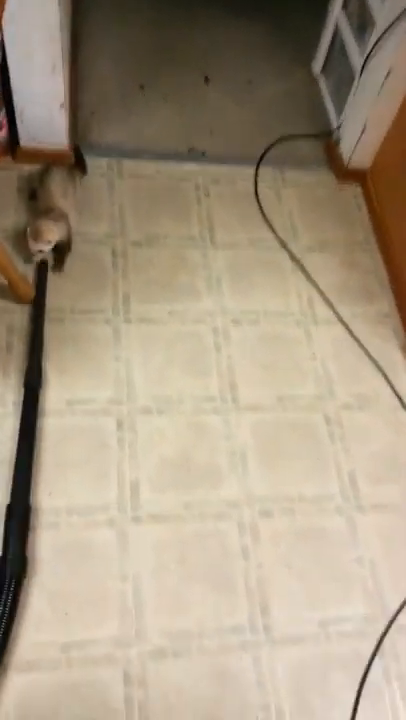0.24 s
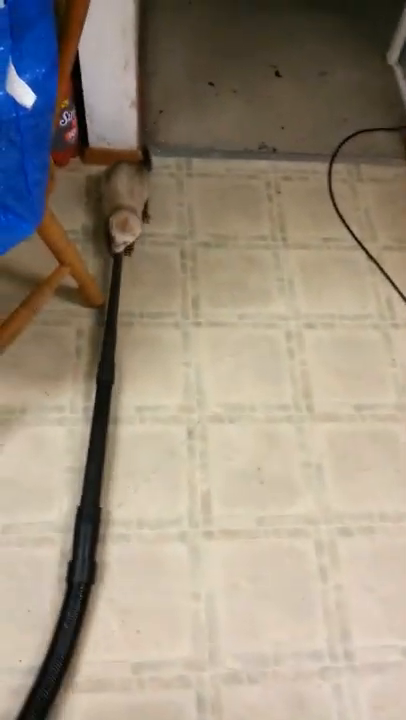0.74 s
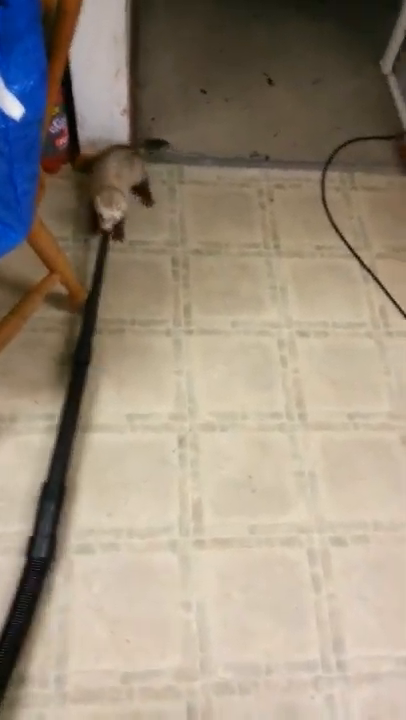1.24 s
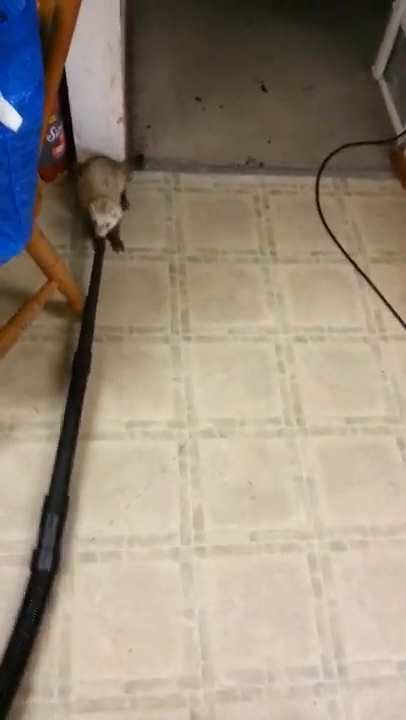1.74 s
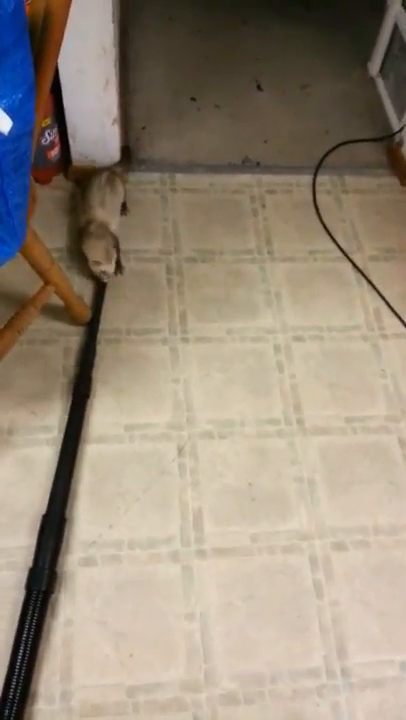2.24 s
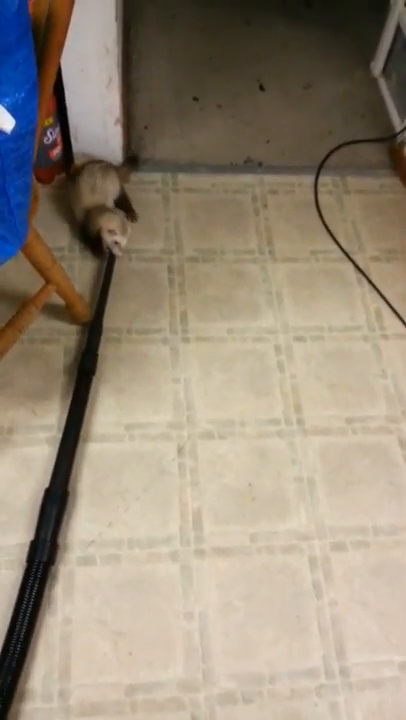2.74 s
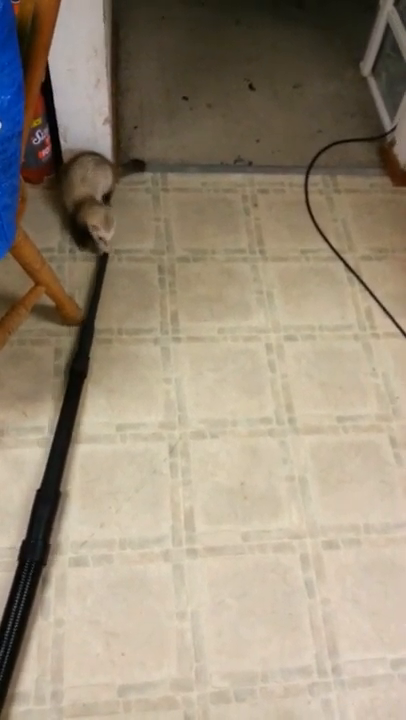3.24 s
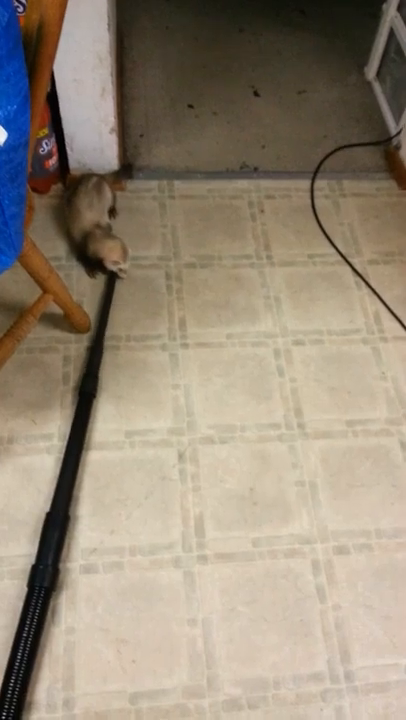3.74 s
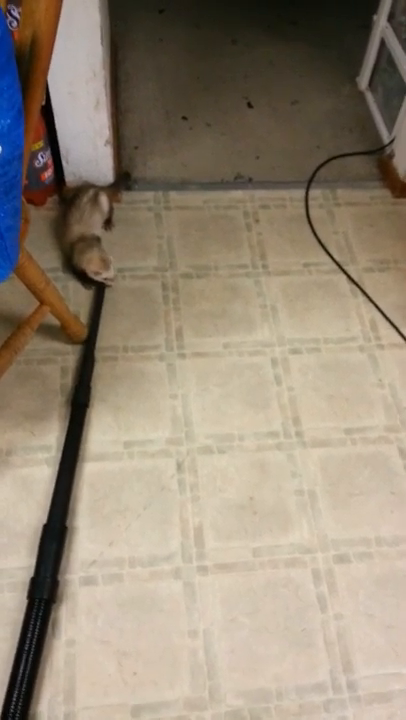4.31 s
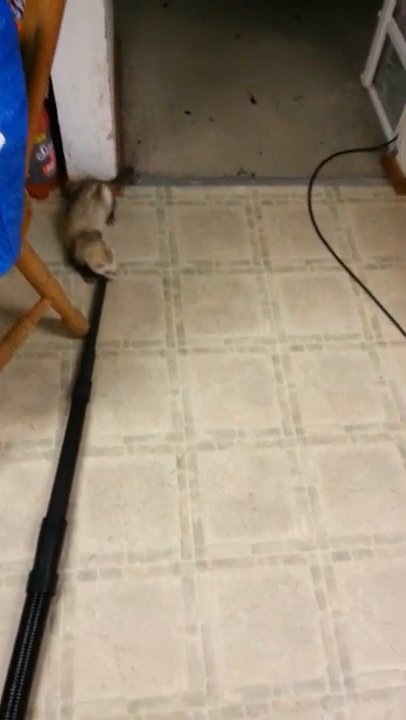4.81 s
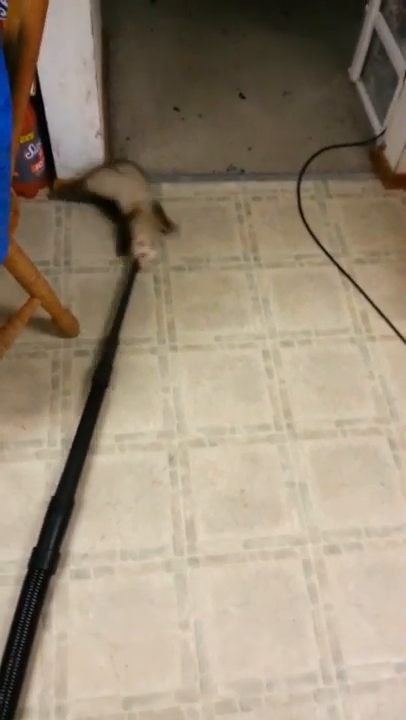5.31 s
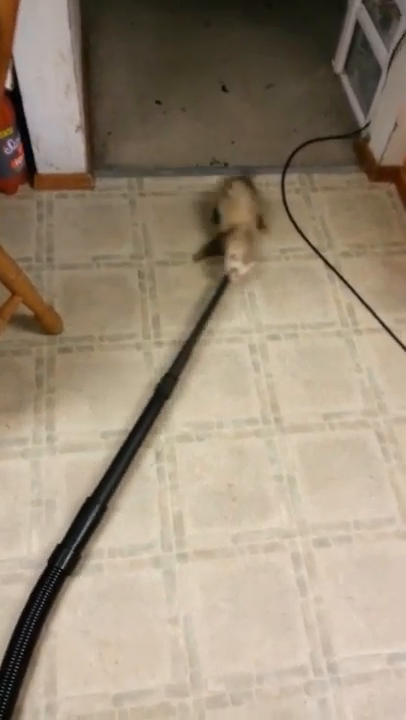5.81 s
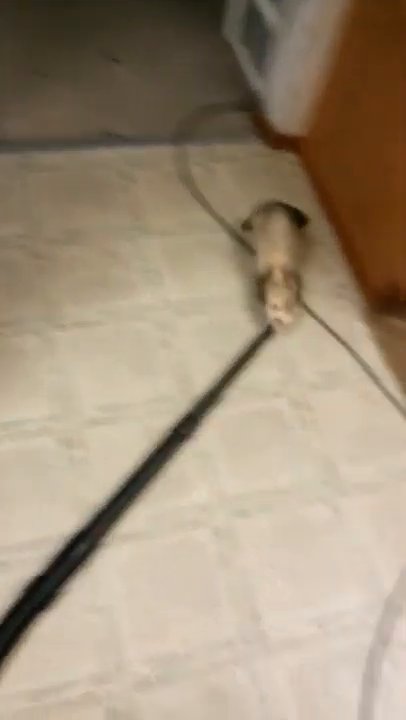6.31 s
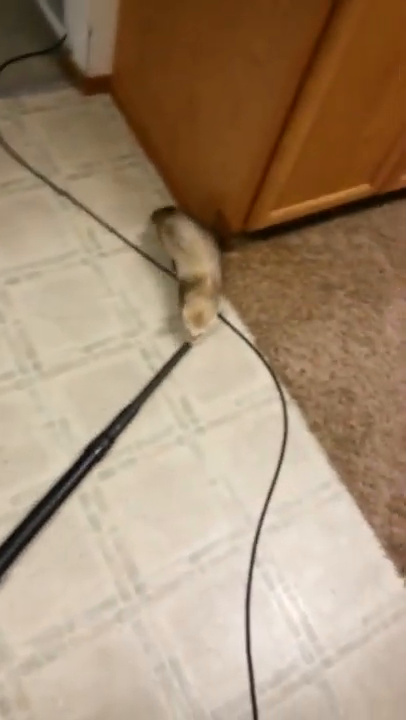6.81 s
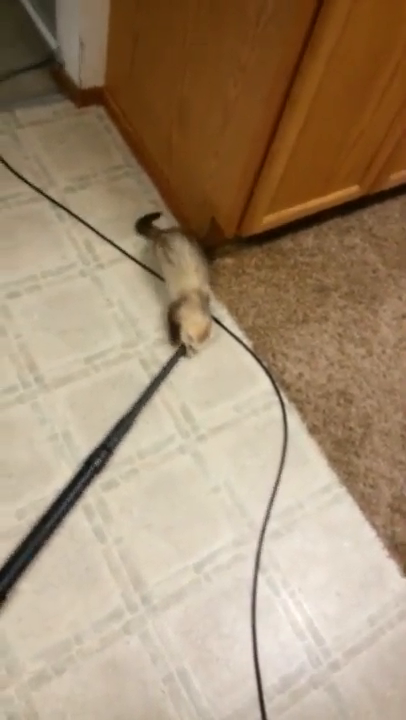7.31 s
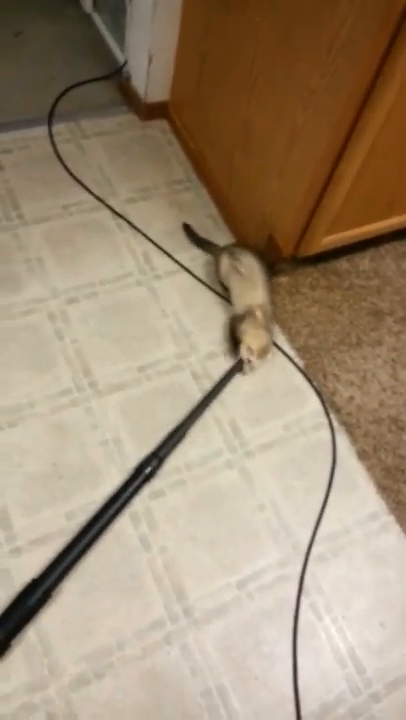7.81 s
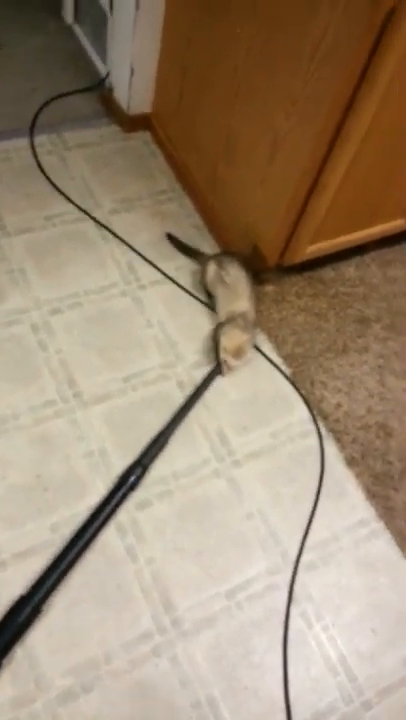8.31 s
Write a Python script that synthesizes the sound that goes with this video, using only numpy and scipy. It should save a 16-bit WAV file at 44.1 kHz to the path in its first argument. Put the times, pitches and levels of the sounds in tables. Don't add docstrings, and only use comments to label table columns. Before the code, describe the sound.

A vacuum cleaner is already running in a hard, reflective tiled kitchen, heard in mono from a handheld microphone. A piercing fan whine and lower motor hum sit over broad rushing air. From about 0.3 s, short hissy swells come from the nozzle as a ferret's snout half blocks it, strongest from 1.0 to 1.9 s, while the motor pitch creeps up. At 1.6 s it is switched off; the whine begins a long, smooth, flickering downward glide, the air thinning and growing darker. A loud, sharp plastic wand knock cracks on the floor at 2.0 s, a lighter one at 3.3 s, a dull one at 5.3 s and a softer one at 6.5 s, each with a short room tail. By then the motor is low and weak. From 7.0 to 8.5 s, faint paw taps and dry scuffs remain above low room hum and slight microphone hiss.

```python
import sys
import numpy as np
from scipy import signal
from scipy.fft import rfft, irfft, next_fast_len
from scipy.io import wavfile
from scipy.ndimage import uniform_filter1d, map_coordinates

SR = 44100
rng = np.random.default_rng(int(sys.argv[2]) if len(sys.argv) > 2 else 0)


def unload_audio(sound):
    columns = np.transpose(np.atleast_2d(sound))
    steps = np.round(np.clip(columns, -1, 1) * 32767)
    wavfile.write(sys.argv[1], SR, steps.astype(np.int16))


def natural_amplitude(level_db):
    exponent = np.asarray(level_db, float) / 20
    return 10 ** exponent


N = 377055
FULL_SPEED_HZ = 500.2

# (centre [Hz], width [Hz], gain [dB])
DUCT_MODES = [(1084, 240, -3), (1380, 450, -5), (1720, 210, -1), (1992, 170, 5.5), (2270, 460, 3.5),
              (2540, 190, 8), (2870, 600, -1), (3374, 650, -3.5), (4200, 1500, -2.5), (5150, 900, 2)]


def unit(x):
    return x / np.sqrt(np.mean(x ** 2) + 1e-20)


def along(points, hz):
    f, v = np.transpose(points)
    return np.interp(np.log(hz + 1), np.log(f + 1), v)


def curves(rows):
    s, *cols = np.transpose(rows)
    return [np.interp(np.arange(N) / SR, s, c) for c in cols]


def wobble(rate_hz):
    coarse = np.arange(0, N + 64, 64)
    knots = rng.standard_normal(int(N * rate_hz / SR) + 4)
    return np.interp(np.arange(N), coarse, map_coordinates(knots, [coarse * rate_hz / SR]))


def filtered(x, response):
    m = next_fast_len(len(x) + 8192)
    return irfft(rfft(x, m) * response(np.fft.rfftfreq(m, 1 / SR)), m)[:len(x)]


def speed():
    # (time [s], shaft speed [Hz])
    powered = [(0.0, 489.5), (0.15, 486.2), (0.3, 485.2), (0.5, 485.4), (0.7, 488.0), (1.05, 496.7),
               (1.2, 498.1), (1.58, 500.2)]
    off_s, ease_s = 1.619, 0.14
    brush_drag, oil_drag, air_drag = 18.24, 0.0378, 0.001466
    shift = oil_drag / (2 * air_drag)
    scale = np.sqrt(brush_drag / air_drag - shift ** 2)
    since_s = np.clip(np.arange(N) / SR - off_s, 0, None)
    start = np.arctan((FULL_SPEED_HZ + shift) / scale)
    coasting = scale * np.tan(start - air_drag * scale * since_s) - shift
    return uniform_filter1d(np.minimum(curves(powered)[0], coasting), size=round(ease_s * SR), mode="nearest")


def follows(law):
    # (time [s], level [dB])
    near = [(0, 1), (.43, -0.2), (.76, 1), (1.0, 2.5), (1.21, 1.3), (1.5, 1), (1.9, 2.1), (2.5, 0.6),
            (3.3, 0.2), (4.1, -0.5), (4.9, -2.3), (5.5, -1.1), (5.9, -2.7), (6.45, -0.5), (6.8, -4.8),
            (7.2, 2.6), (7.8, -6.5), (8.4, -3)]
    full_db, per_db = law
    return full_db + per_db * 20 * np.log10(speed() / FULL_SPEED_HZ) + curves(near)[0]


def heard_db(hz, modes):
    return 10 * np.log10(sum(natural_amplitude(2 * db) / (1 + (2 * (hz - c) / w) ** 2) ** 2 for c, w, db in modes))


def tone(law, modes, order, flutter_db, blur_rad, patchy_db=0):
    shaft_hz = speed()
    turns = np.cumsum(shaft_hz) / SR
    path_db = np.repeat(heard_db(order * shaft_hz[::32], modes), 32)[:N]
    shake_db = flutter_db * wobble(60) + patchy_db * wobble(9)
    phase = 2 * np.pi * order * turns + blur_rad * wobble(30)
    return np.sqrt(2) * natural_amplitude(follows(law) + path_db + shake_db) * np.sin(phase)


def gliding():
    return np.clip((np.arange(N) / SR - 1.55) / 0.1, 0, 1)


def shaft():
    # (centre [Hz], width [Hz], gain [dB])
    housing_modes = [(144, 9.9, -4), (168.5, 8.7, -3), (220.8, 36, -3.5), (294, 57, 1), (347.6, 24, -2),
                     (404, 42, 3), (443.4, 30, 8), (467.5, 20, 4.5), (501, 21.6, 1.5), (1009, 35, -16)]
    flutter_db = -0.4 + 2.6 * gliding()
    once = tone((-24.5, 2.3), housing_modes, order=1, flutter_db=flutter_db, blur_rad=0.13)
    twice = tone((-14, 4), housing_modes, order=2, flutter_db=2.5, blur_rad=0.19)
    return once + twice


def fan():
    # (centre [Hz], width [Hz], gain [dB])
    standing_modes = [(3395, 14, 3), (3426, 17, 0), (3480, 13, 0), (3560, 4, 28)]
    # (centre [Hz], width [Hz], gain [dB])
    vane_modes = [(1290, 300, -5), (1726, 500, 1), (2270, 400, -1.5), (3500, 1100, 0), (4500, 800, -4.5),
                  (6935, 390, -3)]
    flutter_db = 2.5 + 2.2 * gliding()
    blades = tone((-24.5, 2.08), DUCT_MODES + standing_modes, order=7, flutter_db=flutter_db,
                  blur_rad=0.55, patchy_db=1.2)
    overtone = tone((-39.5, 1.2), vane_modes, order=14, flutter_db=4.0, blur_rad=0.66, patchy_db=4.5)
    return blades + overtone


def commutator():
    # (level at full speed [dB], loss per speed loss [dB/dB])
    brush_laws = [(-46, 1.0), (-59, .3), (-62, .3)]
    # (centre [Hz], width [Hz], gain [dB])
    cap_modes = [(4350, 900, 2.5), (5400, 1000, -1.5), (7000, 2000, -7)]
    parts = zip([22, 44, 66], brush_laws, [DUCT_MODES, cap_modes, cap_modes])
    return sum(tone(law, modes, order, flutter_db=4.0, blur_rad=0.5, patchy_db=3.0)
               for order, law, modes in parts)


def rush(spectrum, patchy_db):
    z = signal.stft(rng.standard_normal(N + 512), nperseg=512)[2]
    field = uniform_filter1d(rng.standard_normal(z.shape), size=6, axis=0)
    field = uniform_filter1d(field, size=10, axis=1)
    x = signal.istft(z * natural_amplitude(patchy_db * unit(field)), nperseg=512)[1][:N]
    return unit(filtered(x, lambda hz: natural_amplitude(along(spectrum, hz))))


def sniffs():
    sniff_events = [(0.333, 0.15, -35.5), (0.728, 0.043, -42.5), (.87, 0.13, -47.5), (0.976, 0.13, -32.5),
                    (1.132, .17, -32), (1.288, 0.39, -31.5), (1.692, .18, -33.5), (3.79, .03, -58),
                    (3.97, .03, -61), (5.31, 0.11, -68), (6.078, 0.06, -70), (6.37, 0.035, -59.5)]
    attack_s, release_s = 0.03, 0.053
    t = np.arange(N) / SR
    gain = np.zeros(N)
    for s, hold_s, db in sniff_events:
        swell = (t - s) / attack_s
        release = 1 - (t - s - hold_s) / release_s
        gain += natural_amplitude(db) * np.clip(np.minimum(swell, release), 0, 1)
    return gain


def air():
    # (frequency [Hz], density [dB/Hz])
    rumble_spectrum = [(35, -82.5), (60, -54), (144, -20.5), (257, -17), (374, -8), (481, -2.5), (545, -6),
                       (674, -10.5), (736, -12.5), (877, -12.5), (982, -13), (1200, -11), (1560, -25.5),
                       (2640, -120)]
    # (frequency [Hz], density [dB/Hz])
    exhaust_spectrum = [(410, -37.5), (700, -9), (942, -8), (1130, -3.5), (1420, -6), (1690, -5),
                        (1830, -5.5), (4500, -10.5), (6000, -23), (7800, -46.5), (13200, -120)]
    # (frequency [Hz], density [dB/Hz])
    hiss_spectrum = [(2240, -29), (3800, -3), (5110, -7), (6260, -10.5), (7120, -9.5), (9790, -15),
                     (13500, -26.5), (14500, -39)]
    surge = wobble(11)
    rumble = natural_amplitude(follows((-27.5, 1.24)) - 3.0 + 0.32 * surge) * rush(rumble_spectrum, patchy_db=0.95)
    exhaust = natural_amplitude(follows((-23, 1.954)) + 1.0 + 0.5 * surge)
    exhaust = exhaust * rush([(150, -100)] + exhaust_spectrum, patchy_db=1.33)
    hiss = np.hypot(natural_amplitude(follows((-39.5, 2.18))), sniffs()) * natural_amplitude(7.5 + 0.7 * wobble(12))
    hiss = hiss * rush([(700, -100)] + hiss_spectrum, patchy_db=2.0)
    return rumble + exhaust + hiss


def boom():
    # (frequency [Hz], density [dB/Hz])
    boom_spectrum = [(25, -52), (70, -43.5), (110, -18), (150, 8), (260, 8), (450, -2), (700, -38),
                     (1100, -78)]
    house_db = -60
    low = np.hypot(natural_amplitude(follows((-46.5, 0.55))), natural_amplitude(house_db))
    return low * natural_amplitude(-3.0 + 0.91 * wobble(1.3)) * rush(boom_spectrum, patchy_db=2.4)


def resonances(modes):
    return lambda f: sum((-1) ** k * natural_amplitude(db) * 1j * f * w / (c * c - f * f + 1j * f * w)
                         for k, (c, w, db) in enumerate(modes))


def kitchen(x):
    # (frequency [Hz], t60 [s])
    decay_times = [(150, 0.46), (500, 0.53), (2000, 0.56), (4500, 0.37), (7000, 0.35), (12000, 0.11)]
    hz, t, z = signal.stft(rng.standard_normal(SR // 3), SR, nperseg=256)
    decay_db = -60 * t / along(decay_times, hz)[:, None]
    tail = signal.istft(z * natural_amplitude(decay_db), SR, nperseg=256)[1]
    return signal.fftconvolve(np.pad(x, (50, 0)), tail / np.linalg.norm(tail))[:len(x)]


def contacts(events, trims_db, wet_db, rough):
    # (centre [Hz], width [Hz], gain [dB])
    body_modes = [
        [(3935, 1620, 9.5), (8900, 3000, -3)],
        [(702.5, 950, 0.9), (2700, 2900, 2.5)],
        [(144, 120, 2), (345, 367, 4)],
    ]
    out, t = np.zeros(N + SR), np.arange(SR // 4) / SR
    for s, *levels_db, rise_ms in events:
        u = 1000 * t / max(rise_ms, 0.015)
        grain = rng.standard_normal((len(body_modes), len(t)))
        forces = u * np.exp(1 - u) * (1 - rough + rough * grain)
        dry = np.zeros(len(t))
        for force, modes, db, trim_db in zip(forces, body_modes, levels_db, trims_db):
            part = filtered(force, lambda hz: resonances(modes)(hz) ** 2)
            dry += natural_amplitude(db + trim_db) * part / abs(part).max()
        dry = np.pad(dry, (0, len(t) // 2))
        tail = natural_amplitude(wet_db) * kitchen(dry)
        dry += 0.55 * np.roll(dry, shift=round(SR * 0.001305)) - 0.3 * np.roll(dry, shift=round(SR * 0.0024))
        out[round(s * SR):][:len(dry)] += dry + tail
    return out[:N]


def knocks():
    # (time [s], click [dB], knock [dB], thud [dB], contact time [ms])
    knock_events = [
        (1.9976, 3, -7, -19.5, 0.027),
        (3.2776, -5.5, -16, -22, 0.016),
        (5.3084, -32.5, -30.5, -27.5, 0.054),
        (6.5054, -12.5, -25, -24.5, 0.12),
        (7.006, -49, -40.5, -40, 0.07),
        (7.5098, -55, -49, -44.5, 0.066),
        (7.7237, -41.5, -70.5, -45.5, 0.041),
        (8.052, -54, -49, -44, 0.064),
        (8.1935, -45.5, -49, -46.5, 0.075),
        (8.5444, -41, -67, -53, 0.019),
    ]
    return contacts(knock_events, trims_db=[-1.3, 2.6, -0.6], wet_db=4.5, rough=0.1)


def scuffs():
    # (time [s], rasp [dB], scrape [dB], thud [dB], rise [ms])
    scuff_events = [(6.3809, -42, -53.5, -60, 32), (7.1276, -39.5, -46.5, -46.5, 19.5),
                    (7.3694, -45, -56, -57, 22), (7.6194, -59, -47.5, -76, 19), (7.7403, -51, -54, -53, 15),
                    (8.2103, -47, -53, -58, 12)]
    return contacts(scuff_events, trims_db=[-9, 3.3, 6], wet_db=-1.0, rough=0.87)


def scene():
    machine = shaft() + fan() + commutator() + air()
    return (machine + boom() + knocks() + scuffs())[None]


def band_limit(x):
    return signal.sosfilt(signal.butter(12, 14640, fs=SR, output="sos"), x)


def record(dry):
    # (frequency [Hz], density [dB/Hz])
    self_noise = [(15, -61.5), (25, -34), (51, -7), (92, -7), (123, 1), (149, -19), (643, -33), (1720, -22),
                  (7060, -30), (14500, -28.5)]
    hiss = unit(filtered(rng.standard_normal(N), lambda hz: natural_amplitude(along(self_noise, hz))))
    x = dry[0] + natural_amplitude(-64.0) * hiss
    x = x / (1 + np.abs(x) ** 8) ** (1 / 8)
    return band_limit(x[None])


dry = scene()
out = record(dry)
unload_audio(out)
```